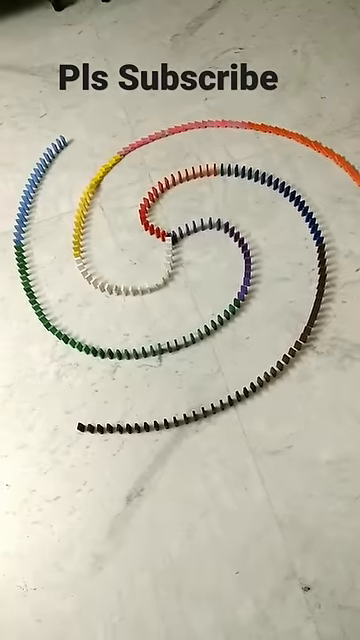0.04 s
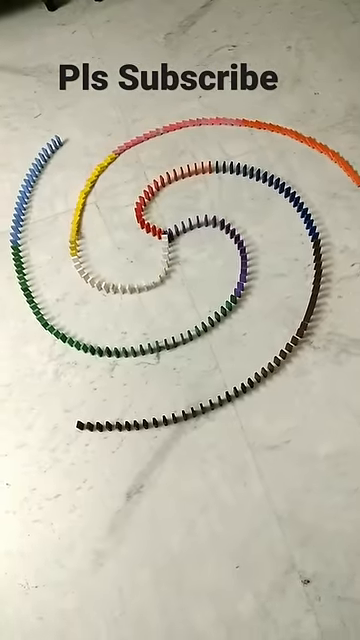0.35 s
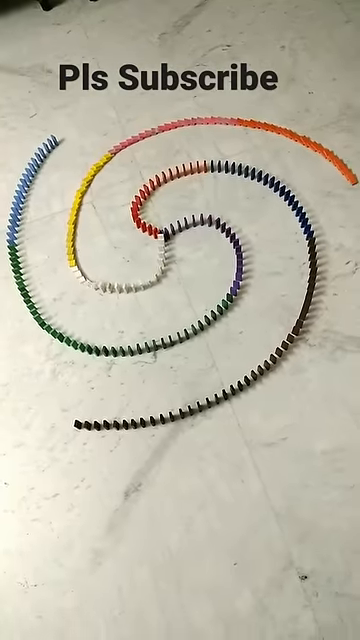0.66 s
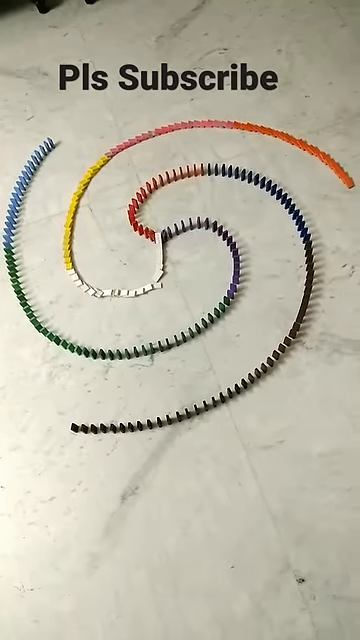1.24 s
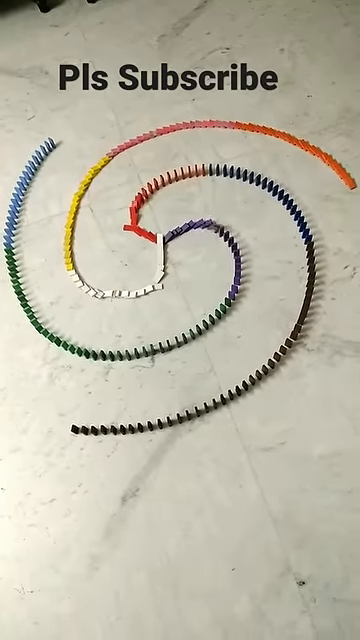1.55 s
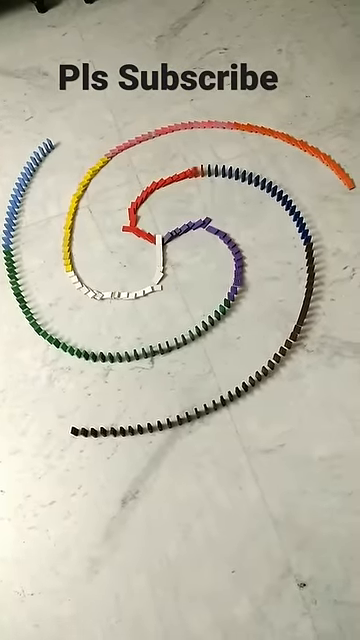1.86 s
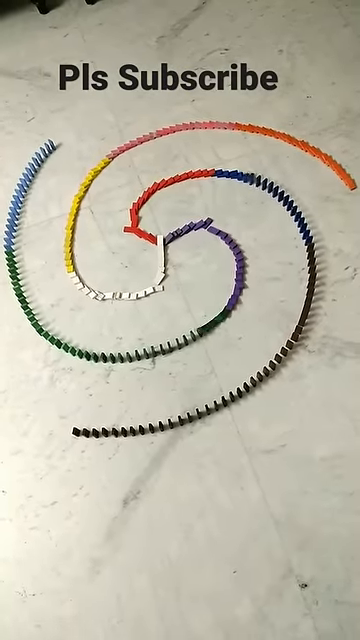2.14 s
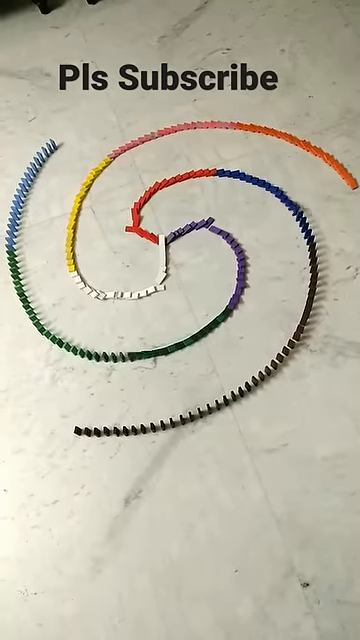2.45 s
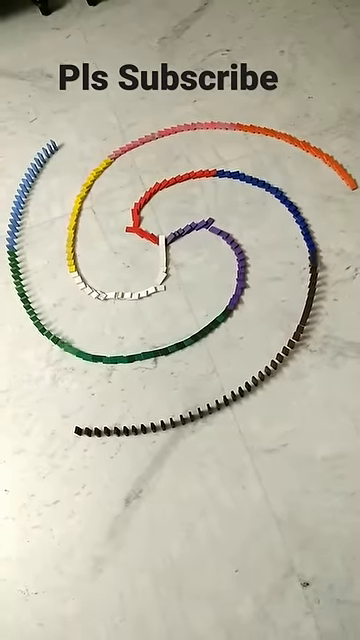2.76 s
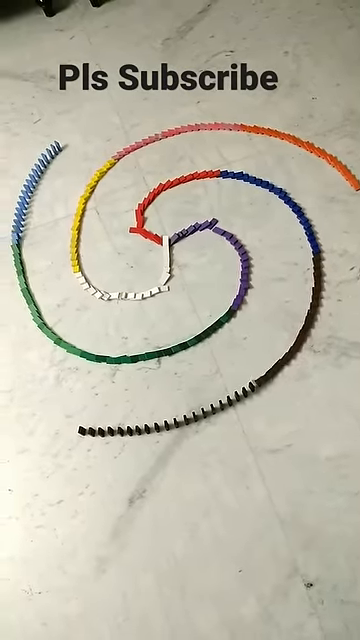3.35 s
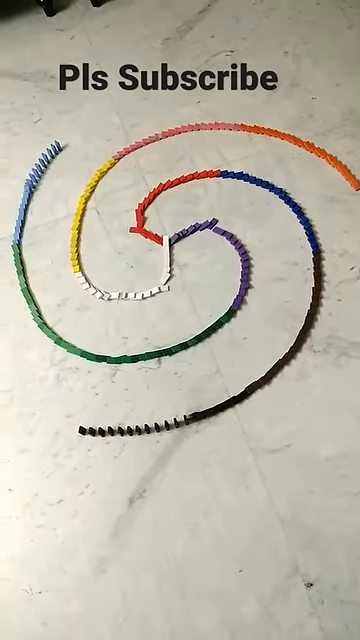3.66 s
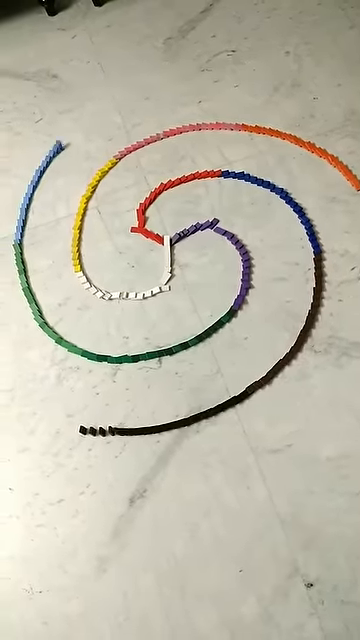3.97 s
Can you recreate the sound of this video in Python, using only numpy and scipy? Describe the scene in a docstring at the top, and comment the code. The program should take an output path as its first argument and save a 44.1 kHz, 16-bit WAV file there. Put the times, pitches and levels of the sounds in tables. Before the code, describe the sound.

Small plastic dominoes topple in a continuous rattling clatter on a stone floor.

```python
"""Three spiral rows of small plastic dominoes start toppling at once on a stone floor, over a low rumble.
Each tile knocks the next and the leaning tiles chatter on one another, while a bare room rings behind.
Now and then a run slaps flat on the stone with a bright crack, then rattles as it settles.
One row runs out at 1.6 s; the other two clatter on, thinner and softer."""
import sys
import numpy as np
from scipy import signal
from scipy.fft import rfft, irfft
from scipy.io import wavfile

SR = 44100
rng = np.random.default_rng(int(sys.argv[2]) if len(sys.argv) > 2 else 0)


def pcm_store(signal):
    """Save signal as 16-bit PCM."""
    levels = np.round(np.clip(np.atleast_2d(signal), -1, 1) * 32767)
    wavfile.write(sys.argv[1], SR, levels.astype(np.int16).T)


N = 176400
T = np.arange(N) / SR
ONSET_LAG_S = .0011  # short fixed delay from each cue to its hit
MIC_LAG_S, PAN_SCATTER_DB = .00005, 1.6
TILE_HZ, CLACK_SPREAD_OCT = 3760, .15
TILE_CONTACT = dict(ring_s=.00061, grit=.27, grit_s=.00077, tick=.43)
STONE_CONTACT = dict(ring_s=.0018, grit=.26, grit_s=.00091, tick=.3)


def amp(db):
    """Decibels to gain."""
    return 10 ** (np.asarray(db) / 20)


def fader(table, t):
    """Gain of a level curve at times t."""
    return amp(np.interp(t, *np.array(table).T))


def eq_response(eq, size=2048):
    """Minimum-phase impulse response of an EQ curve (freq_hz, gain_db)."""
    hz, db = np.array(eq, float).T
    bins_hz = np.maximum(np.fft.rfftfreq(size, 1 / SR), 1)
    cepstrum = irfft(np.log(amp(np.interp(np.log(bins_hz), np.log(hz), db))))
    cepstrum[1:size // 2] *= 2
    cepstrum[size // 2 + 1:] = 0
    return irfft(np.exp(rfft(cepstrum)))


def through(x, impulse):
    """Sound passed through an impulse response."""
    return signal.fftconvolve(np.atleast_2d(x), np.atleast_2d(impulse), axes=1)[:, :N]


def arrival(when, side, place):
    """Sample at which a hit starts in the left (+1) or right (-1) channel."""
    return ((when + ONSET_LAG_S - side * MIC_LAG_S * (1 + place) / 2) * SR).astype(int)


def contacts(times, gains, eq, hz, spread_oct, ring_s, grit, grit_s, tick, ring=.16, size=256):
    """Hard contacts: a tick, a trace of grit and a very short ring, each with its own pitch and place."""
    out, t = np.zeros((2, N + 2 * size)), np.arange(size) / SR
    chance = np.random.default_rng(rng.integers(1 << 30)).standard_normal((len(times), 2 * size + 3))
    detune, pan, place = chance[:, :3].T
    noise = chance[:, 3:].reshape(-1, 2, size)
    pitch = hz * 2 ** (spread_oct * detune)
    rings = ring * np.cos(2 * np.pi * pitch[:, None] * t) * np.exp(-t / ring_s)
    hits = rings[:, None] + grit * noise * np.exp(-t / grit_s)
    hits[:, :, 0] += tick
    for ch, side in enumerate((1, -1)):
        panned = gains * amp(side * PAN_SCATTER_DB * pan / 2)
        for i, gain, hit in zip(arrival(times, side, place), panned, hits[:, ch]):
            if 0 <= i < N:
                out[ch, i:i + size] += gain * hit
    colour = eq_response(eq)
    return through(out[:, :N], colour / np.abs(colour).max() / 2)


# Boomy tone of the low bed: freq_hz, gain_db
RUMBLE_EQ = [(25, -25), (50, -21), (80, -3.5), (100, -3), (116, 0), (135, -6.5), (160, 2), (182, -8.5),
             (200, 5.5), (215, -7.5), (235, -0.5), (300, -5.5), (450, -5.5), (600, -13), (1500, -19.5),
             (6000, -29.5)]
# Fader ride on the bed: time_s, level_db
RUMBLE_RIDE = [(0.0, -61), (0.07, -64), (0.54, -58), (0.59, -64.5), (0.63, -55.5), (0.83, -53.5),
               (1.2, -63.5), (1.57, -66.5), (2.75, -66), (2.78, -70.5), (3.16, -65), (3.56, -73),
               (3.97, -75), (4.0, -87)]
def rumble(width=.71, trim_db=-.5):
    """A low noise bed with a few boomy resonances; it swells early on, then sinks away."""
    noise = rng.standard_normal(N) + width * rng.standard_normal((2, N))
    bed = through(noise, eq_response(RUMBLE_EQ, size=8192))
    return bed / bed.std() * fader(RUMBLE_RIDE, T) * amp(trim_db)


def room(x, tail_db=2, low_t60_s=.68, treble_t60_s=.33, build_s=.005, echo_s=.0052, echo_db=-8, steps=40):
    """One near reflection and a diffuse tail whose treble dies first; both shift as the fronts travel."""
    t, hop = T[:SR // 2], N // steps
    out = np.zeros((2, N + SR))
    crossover = signal.butter(2, 5000, fs=SR, output="sos")
    for k in range(steps + 1):
        noise = rng.standard_normal((2, len(t)))
        low = signal.sosfilt(crossover, noise)
        tail = low * amp(-60 * t / low_t60_s) + (noise - low) * amp(-60 * t / treble_t60_s)
        tail *= 1 - np.exp(-t / build_s)
        impulse = amp(tail_db) * tail / np.linalg.norm(tail, axis=1, keepdims=True)
        delay_s = echo_s * (1 + .089 * rng.uniform(-1, 1, 2))
        impulse[[0, 1], (delay_s * SR).astype(int)] += amp(echo_db)
        span = np.arange(max((k - 1) * hop, 0), min((k + 1) * hop, N))
        crossfade = np.cos(np.pi / 2 * (span / hop - k))
        wet = signal.fftconvolve(x[:, span] * crossfade, impulse, axes=1)
        out[:, span[0]:span[0] + wet.shape[1]] += wet
    return out[:, :N]


# Force of the toppling, riding both the chatter and the rows: time_s, gain_db
FORCE_RIDE = [(0, 10), (.06, 1.5), (.16, 1), (.2, 6), (.45, 2.5), (.53, -6), (.6, 0.5), (.83, 1),
              (.94, -21), (.98, 5), (1.17, 1.5), (1.33, 6), (1.39, -13), (1.46, 4), (1.7, 3), (1.95, 2),
              (2.07, 5), (2.18, 0.5), (2.5, 3), (2.65, -1.5), (2.9, -0.5), (3.05, -2.5), (3.3, -3.5),
              (3.6, -7), (3.9, -5.5), (4, -7)]
# Tone of tiles slipping on tiles: freq_hz, gain_db
CHATTER_EQ = [(60, -30), (200, -13.5), (500, -8), (1000, -5), (1600, -1), (2400, -1), (3300, -7),
              (4600, -0.5), (4950, -15), (5600, -8.5), (7000, -5), (9000, -7.5), (12000, -1), (14000, -8),
              (14600, -27)]
def chatter(ticks_per_s=400, level_db=-45, scatter_db=3.5, count=3000):
    """Behind each front the leaning tiles slip and tick against one another."""
    times = np.cumsum(rng.exponential(size=count)) / ticks_per_s
    tick_db = level_db + scatter_db * np.minimum(rng.standard_normal(count), 2)
    gains = amp(tick_db) * fader(FORCE_RIDE, times)
    return contacts(times, gains, CHATTER_EQ, TILE_HZ, spread_oct=.43, **TILE_CONTACT)


def clacks(times, gains, hz, swell_s=.00019, ring_db=-22, ring_s=.0013, size=256):
    """The body of a struck tile: a clack that swells and dies in a few cycles, then rings faintly."""
    out, t = np.zeros((2, N + size)), np.arange(size) / SR
    envelope = (t / swell_s * np.exp(1 - t / swell_s)) ** 2 + amp(ring_db) * np.exp(-t / ring_s)
    for when, gain, pitch, place in zip(times, gains, hz, rng.standard_normal(len(times))):
        for ch, side in enumerate((1, -1)):
            i = arrival(when, side, place)
            if 0 <= i < N:
                out[ch, i:i + size] += gain * envelope * np.sin(2 * np.pi * pitch * t)
    return out[:, :N]


# Tone of the edge tick, tile on tile: freq_hz, gain_db
TICK_EQ = [(60, -29), (200, -28), (500, -10), (1000, -20), (1600, -16), (2400, -7), (3300, -2), (4400, -3),
           (4950, -7), (5600, 6), (7000, -17), (9000, -12), (12000, -13), (14500, -22)]
def knocks(times, gains, hz, tick_db=-10, corner_lag_s=.001792, corner_db=-9.5):
    """A tile strikes the next: the edges tick and one corner clacks just before the other."""
    second_corner = times + corner_lag_s * (.5 + rng.random(len(times)))
    ticks = contacts(times, gains * amp(tick_db), TICK_EQ, hz, CLACK_SPREAD_OCT, **TILE_CONTACT)
    return clacks(times, gains, hz) + clacks(second_corner, gains * amp(corner_db), hz) + ticks


# Knock patterns of the three rows: tiles_per_s, level_db, pattern_until_s
# From 2.85 s the lead row runs on in KNOCK_CUES, its knocks listed one by one.
DOMINO_ROWS = [(33.34, -43, 2.85), (28.98, -42, 4.2), (36.32, -47.5, 1.6)]
def rows(timing_scatter=.14, scatter_db=3, count=180):
    """Along each row the tiles knock one another over at a nearly even pace."""
    out = 0
    for tiles_per_s, level_db, pattern_until_s in DOMINO_ROWS:
        drag, strength, detune = rng.standard_normal((count, 3)).T
        times = (np.cumsum(1 + timing_scatter * drag) - 1) / tiles_per_s
        knock_db = level_db + scatter_db * np.minimum(strength, 1)
        gains = amp(knock_db) * fader(FORCE_RIDE, times) * (times < pattern_until_s)
        out = out + knocks(times, gains, TILE_HZ * 2 ** (CLACK_SPREAD_OCT * detune))
    return out


# Tile-on-tile accents, and the lead row from 2.85 s: start_s, level_db, pitch_hz
KNOCK_CUES = [(0.187, -25, 4070), (0.2684, -33.5, 3230), (0.2985, -38, 4060), (0.341, -39, 3480),
              (0.4065, -37, 3630), (0.4397, -29, 3360), (0.4722, -31, 3300), (0.5841, -33, 3360),
              (0.6136, -33.5, 3260), (0.6971, -32.5, 2500), (0.7354, -32.5, 3100), (0.7662, -37, 3280),
              (0.829, -30, 3580), (0.9153, -37, 2960), (0.9622, -30.5, 3300), (1.0021, -35, 3950),
              (1.035, -33, 3500), (1.073, -33.5, 2900), (1.0826, -40, 3500), (1.1101, -34, 4090),
              (1.178, -31, 3630), (1.1854, -39, 4030), (1.2198, -32, 3380), (1.2593, -36, 4100),
              (1.2973, -29, 3880), (1.3185, -32, 3520), (1.454, -33, 3380), (1.7963, -33.5, 3870),
              (1.946, -34, 3400), (2.0504, -28.5, 3800), (2.416, -33.5, 3920), (2.4268, -34.5, 3840),
              (2.5177, -42, 3330), (2.5586, -33.5, 3950), (2.5973, -34, 3130), (2.6259, -27, 3480),
              (2.6608, -35, 3690), (2.6906, -35, 3890), (2.7347, -31, 3600), (2.7689, -38, 3130),
              (2.795, -28, 4100), (2.8254, -33, 3230), (2.8888, -32.5, 4200), (2.9169, -30.5, 3580),
              (2.9529, -34.5, 3850), (2.9842, -37, 3100), (3.019, -31, 4030), (3.0492, -38.5, 3650),
              (3.0777, -35, 4550), (3.1118, -36.5, 3500), (3.1455, -32.5, 3700), (3.1759, -33, 4040),
              (3.2062, -34, 3760), (3.264, -33.5, 4070), (3.3232, -39.5, 3900), (3.3346, -37.5, 4200),
              (3.3618, -40.5, 3550), (3.404, -38.5, 3300), (3.4308, -38, 3370), (3.465, -41, 3820),
              (3.502, -41, 3720), (3.535, -39, 3840), (3.5724, -40.5, 3340), (3.609, -42, 3830),
              (3.6504, -41, 3770), (3.655, -42.5, 3730), (3.6864, -42, 3950), (3.7854, -40, 4000),
              (3.8562, -40, 3860), (3.9265, -41, 3750)]
def hard_knocks():
    """The hardest strikes of tile on tile poke out of the clatter."""
    start_s, level_db, pitch_hz = np.array(KNOCK_CUES).T
    return knocks(start_s, amp(level_db), pitch_hz)


# Bright click of a tile on stone: freq_hz, gain_db
CLICK_EQ = [(100, -33), (1000, -16), (2000, -8.5), (3300, -1), (4400, 3.5), (4950, -3.5), (5800, 3),
            (7000, -0.5), (8100, -2), (9500, -0.5), (10600, -17.5), (13000, -2), (14100, -6),
            (14700, -19.5)]
# Brittle top of an edge on stone: freq_hz, gain_db
CRACK_EQ = [(500, -46), (4500, -0.5), (5800, -0.5), (8500, -12), (9600, -1.5), (10500, 0), (12000, 0.5),
            (13200, 2), (14200, -12.5), (14800, -24.5)]
def on_stone(times, gains, hz, crack_db, crack_hz=11630, spread_oct=.1):
    """Tiles hit the stone floor: a bright click layered with the high crack of an edge."""
    click = contacts(times, gains, CLICK_EQ, hz, spread_oct, **STONE_CONTACT)
    crack = contacts(times, gains * amp(crack_db), CRACK_EQ, crack_hz, spread_oct, **STONE_CONTACT)
    return click + crack


# Flat falls and their rattles: start_s, slap_db, rattle_db, rattle_s, pitch_hz, crack_gain_db
SLAP_CUES = [(0.004, -34, -42, 0.092, 7780, 2.5), (0.189, -23, -37.5, 0.13, 7700, -4),
             (0.261, -34, -39.5, 0.13, 8150, -5), (0.387, -39, -34.5, 0.072, 7800, -7.5),
             (0.5525, -21.5, -36.5, 0.07, 8070, -18), (0.697, -31, -41, 0.042, 7450, -18),
             (0.7986, -28.5, -37, 0.03, 7670, -9), (0.917, -43, -59, .015, 7900, -12),
             (0.9622, -26, -37.5, 0.17, 8270, -19), (1.2196, -31.5, -39, 0.13, 7600, -10),
             (1.4157, -28, -39, 0.18, 8170, -8), (1.5538, -20.5, -32, 0.029, 7770, 6),
             (1.5829, -14.5, -31.5, 0.021, 8040, -0.5), (1.5916, -21, -51, 0.03, 7830, -3.5),
             (1.724, -35, -41, 0.11, 7880, -3), (1.875, -26, -41.5, 0.17, 8400, -3.5),
             (2.008, -26, -36.5, 0.087, 9400, -3), (2.208, -47, -50, 0.13, 8340, 3),
             (2.315, -33.5, -43.5, .06, 8700, -4), (2.3883, -35, -40, 0.075, 7870, -1.5),
             (2.517, -36, -37, 0.028, 8700, -5), (2.558, -26, -40.5, 0.083, 8570, -14),
             (2.628, -31.5, -43, 0.2, 7770, 4.5), (2.824, -30.5, -44.5, 0.09, 9240, 2),
             (2.957, -39.5, -50, 0.18, 8000, 3.5), (3.1114, -39, -48, 0.14, 8400, 4.5),
             (3.211, -41, -49.5, 0.22, 7300, 4.5), (3.402, -40.5, -52, 0.079, 7900, 5.5),
             (3.501, -46, -56.5, 0.12, 8200, -10), (3.651, -40, -54.5, 0.11, 8000, -12),
             (3.863, -38, -41.5, 0.033, 8700, -4)]
def rattles(bounces_per_s=230, scatter_db=3, count=50):
    """After each slap the neighbouring tiles bounce and settle."""
    start_s, _, rattle_db, rattle_s, pitch_hz, crack_db = np.array(SLAP_CUES).T[:, :, None]
    after_s = (1 + np.arange(count) + rng.random((len(SLAP_CUES), count))) / bounces_per_s
    settle = 1 / (1 + (after_s / rattle_s) ** 6)
    gains = settle * amp(rattle_db + scatter_db * np.minimum(rng.standard_normal(after_s.shape), 1))
    times = start_s + after_s
    return on_stone(times.ravel(), gains.ravel(), np.repeat(pitch_hz, count), np.repeat(crack_db, count))


def slaps(min_crack_db=-4):
    """A tile lands flat on the stone, always with some brittle snap."""
    start_s, slap_db, _, _, pitch_hz, crack_db = np.array(SLAP_CUES).T
    return on_stone(start_s, amp(slap_db), pitch_hz, np.maximum(crack_db, min_crack_db))


def scene(accent_send_db=-2.5):
    """The mix: the hardest hits face the microphones, so they send less to the room than the clatter."""
    accents = hard_knocks() + slaps()
    clatter = rows() + chatter() + rattles()
    reverb = room(amp(accent_send_db) * accents + clatter)
    return accents + clatter + reverb + rumble()


# Tone of the left and right microphones: freq_hz, gain_db
LEFT_MIC_EQ = [(100, 2.5), (250, 5.5), (700, 5), (1400, 3), (2400, 4.5), (3700, 8.5), (4800, 1), (6000, 5),
               (8000, 1), (10000, 2.5), (14000, -7)]
RIGHT_MIC_EQ = [(100, -10.5), (250, -9), (700, 5), (1400, 1), (2400, 3), (3700, 0), (4800, 1.5), (6500, 3),
                (8100, 12.5), (10000, 2), (14000, -8.5)]
def record(dry):
    """A phone about a metre up: two differently coloured microphones and a steep high cut."""
    coloured = through(dry, [eq_response(LEFT_MIC_EQ), eq_response(RIGHT_MIC_EQ)])
    high_cut = signal.ellip(8, .2, 70, 14800, fs=SR, output="sos")
    return signal.sosfilt(high_cut, coloured)


dry = scene()
out = record(dry)
pcm_store(out)
```